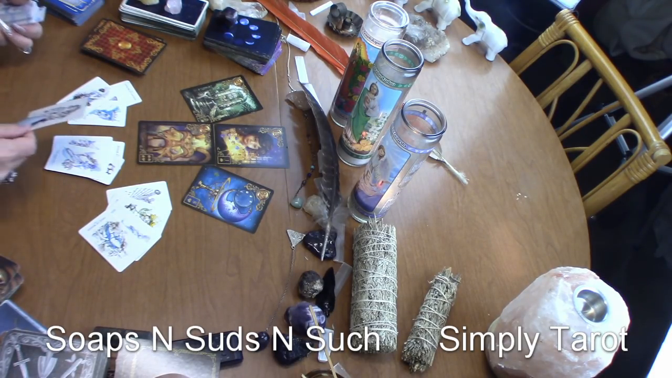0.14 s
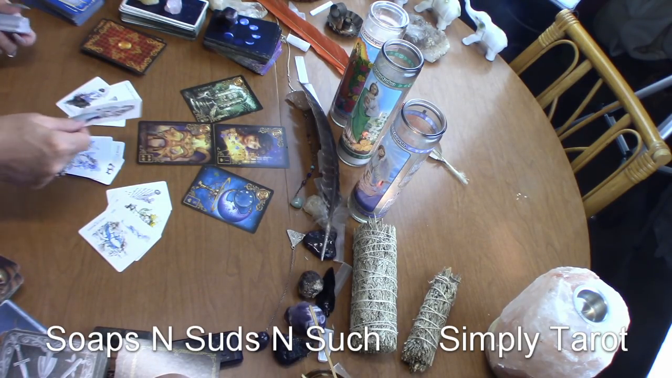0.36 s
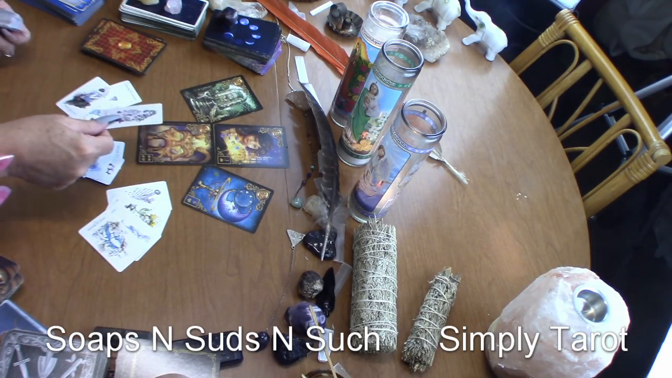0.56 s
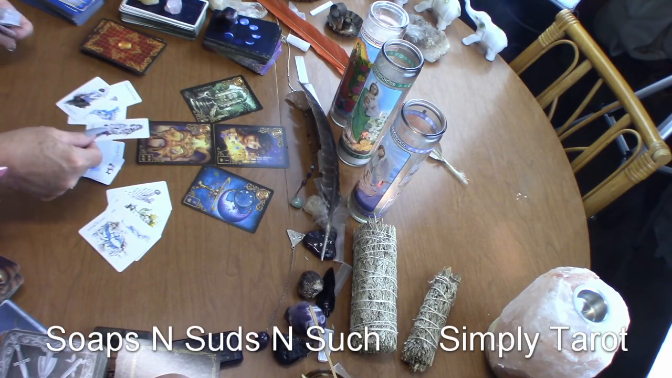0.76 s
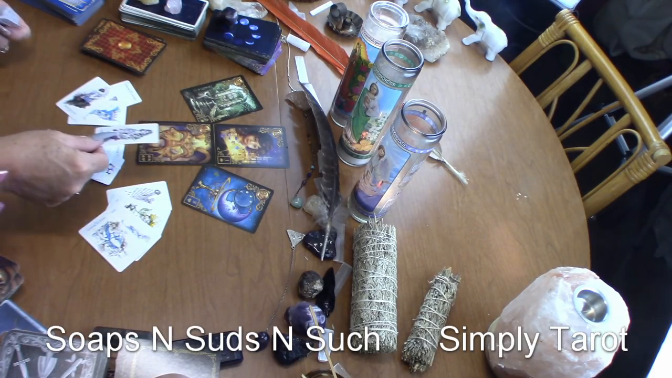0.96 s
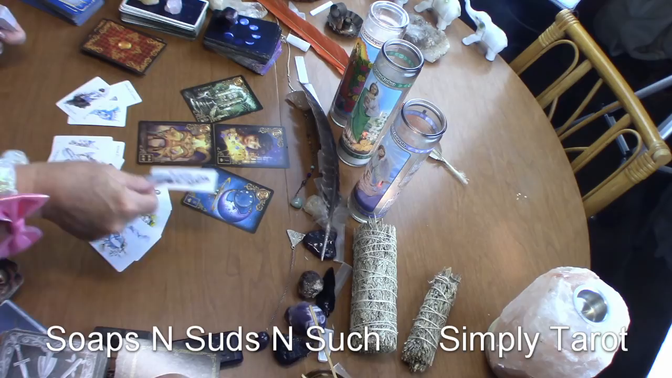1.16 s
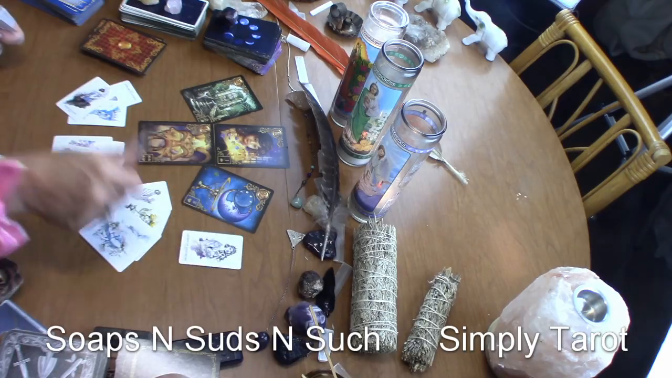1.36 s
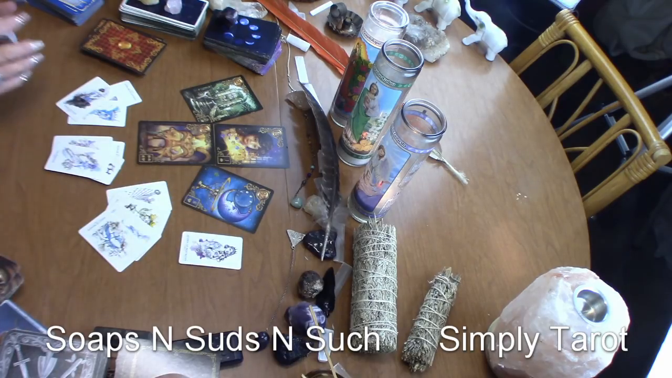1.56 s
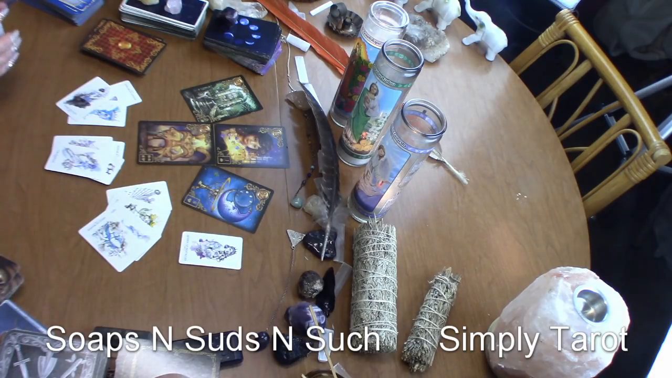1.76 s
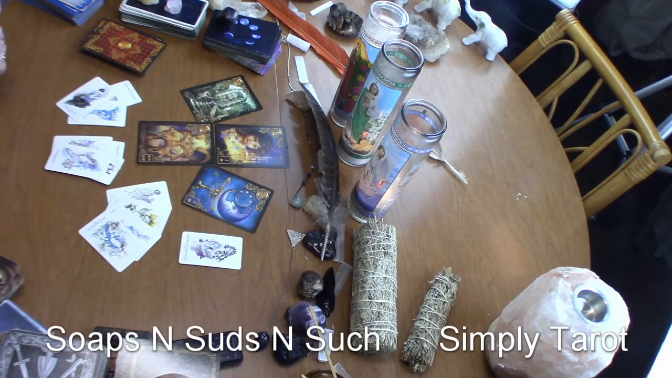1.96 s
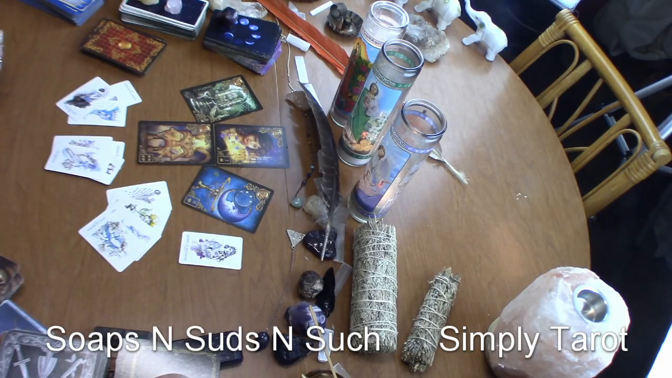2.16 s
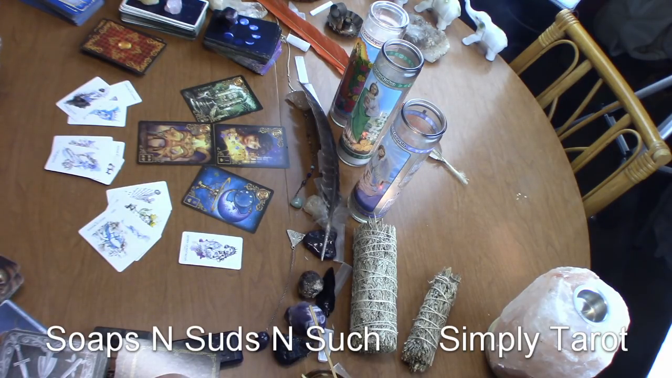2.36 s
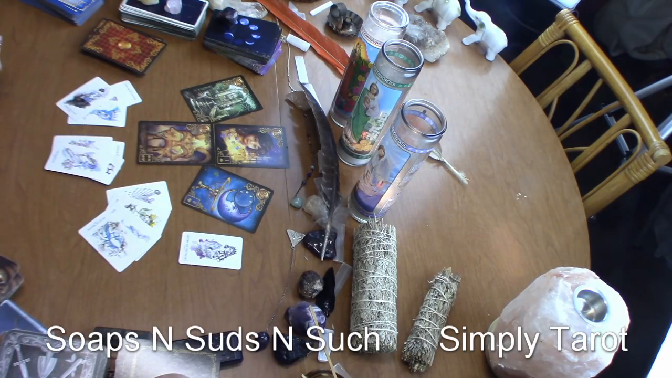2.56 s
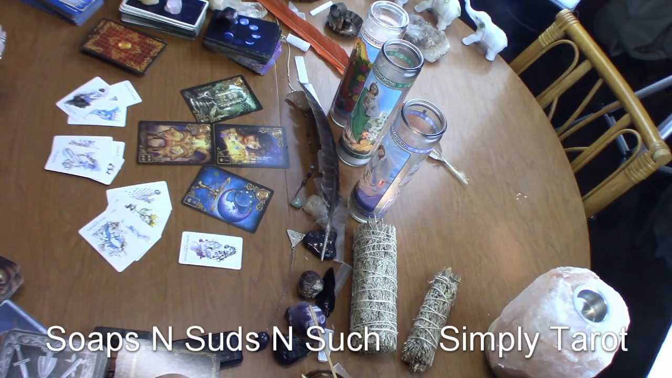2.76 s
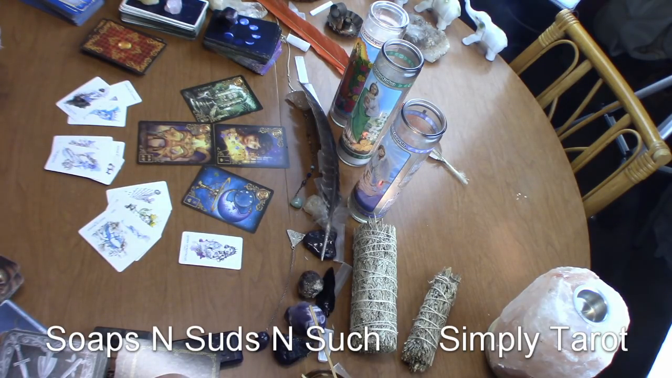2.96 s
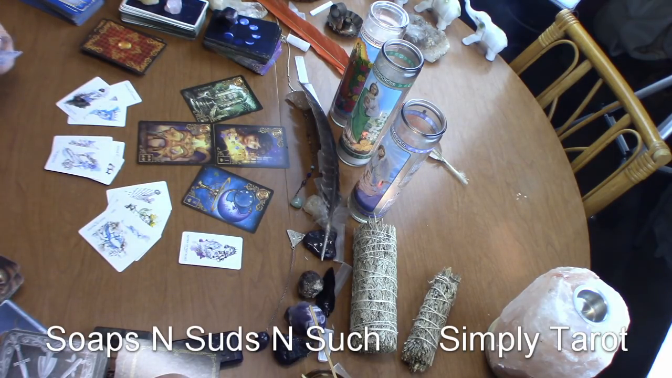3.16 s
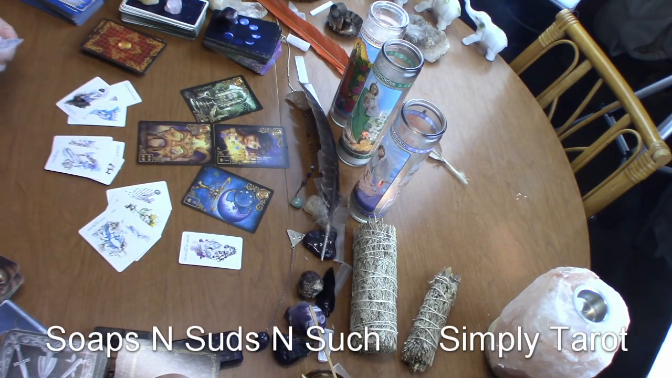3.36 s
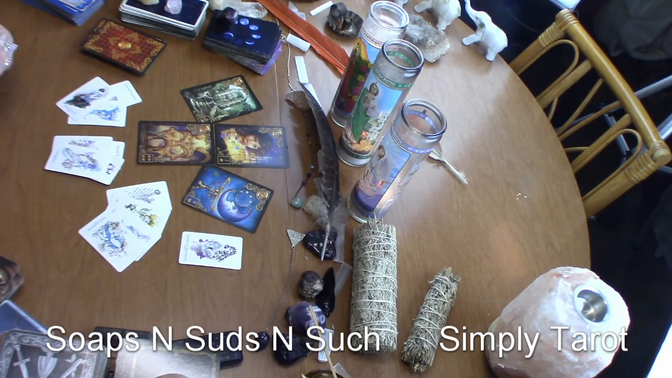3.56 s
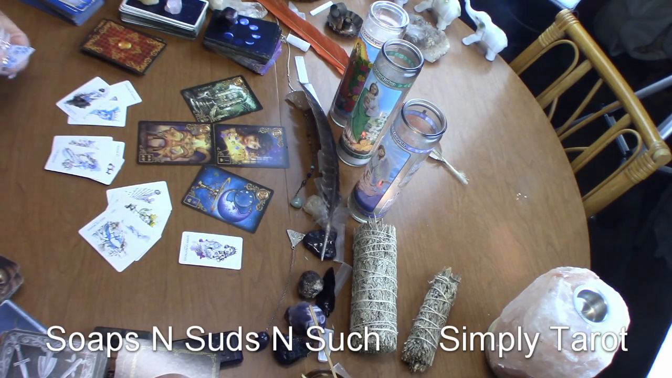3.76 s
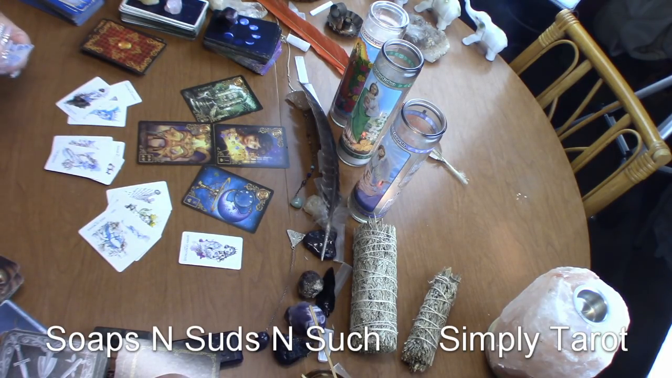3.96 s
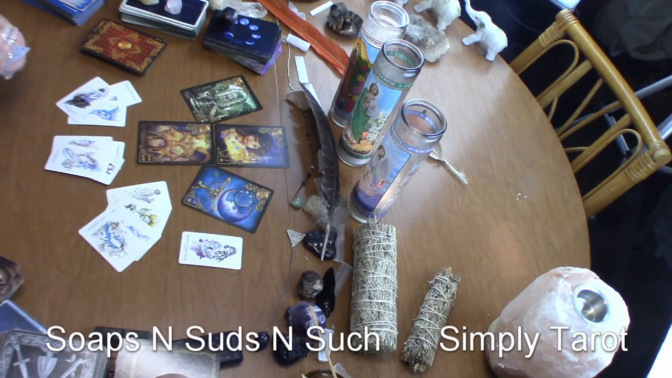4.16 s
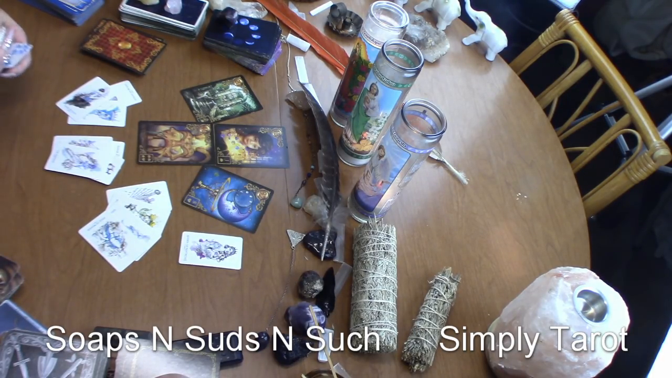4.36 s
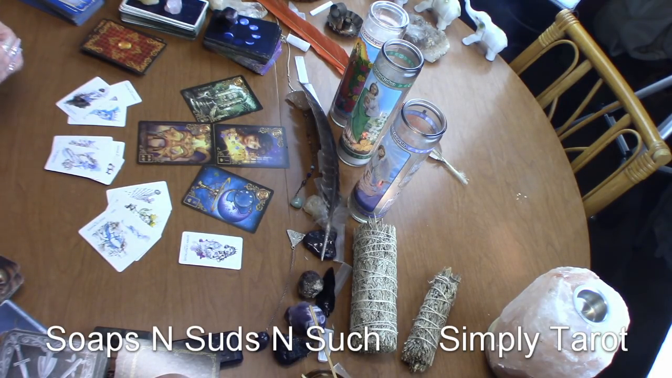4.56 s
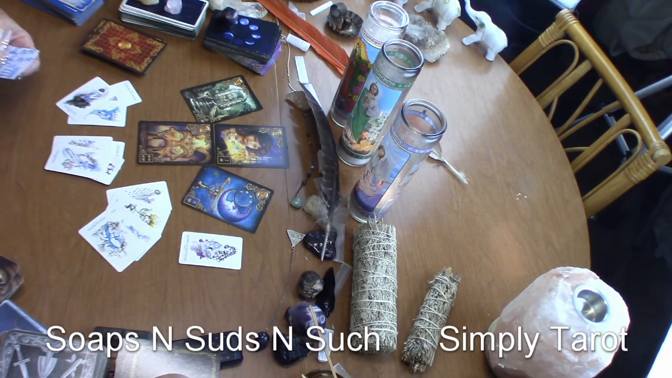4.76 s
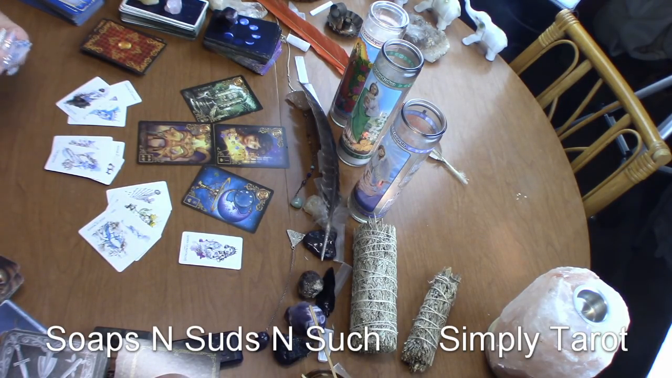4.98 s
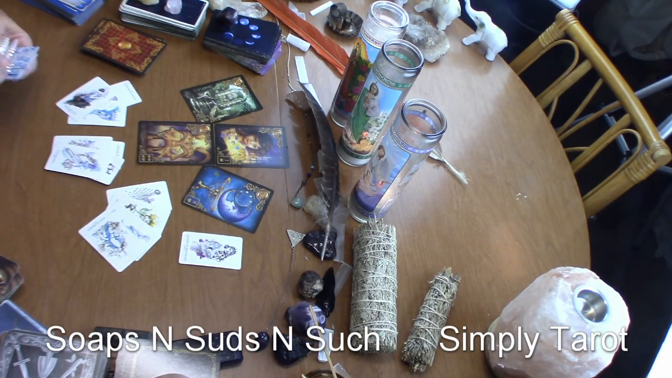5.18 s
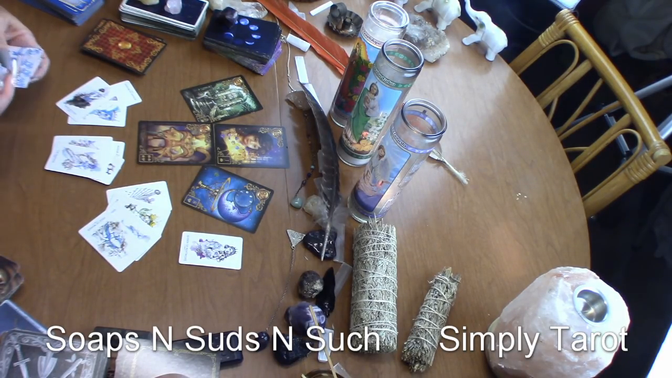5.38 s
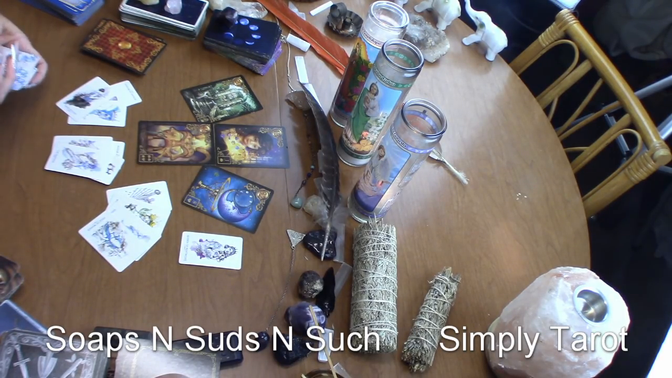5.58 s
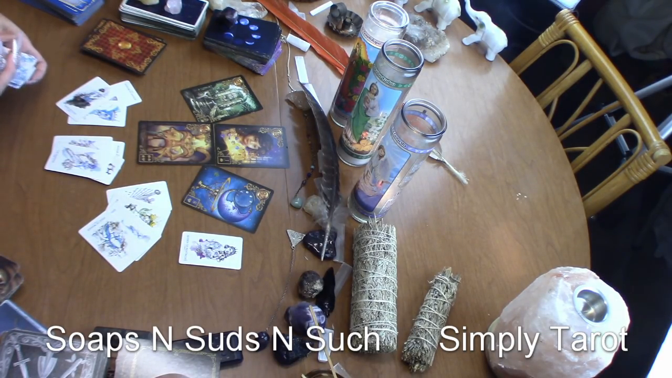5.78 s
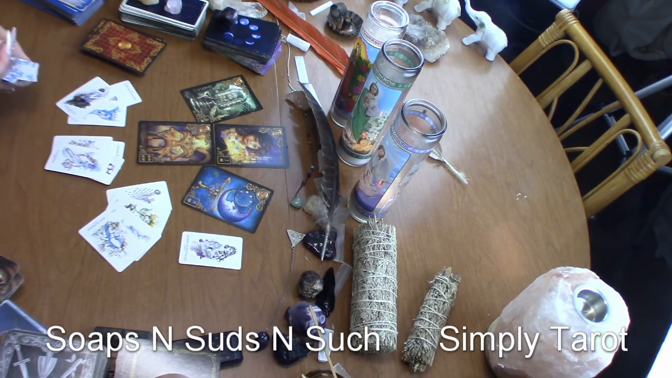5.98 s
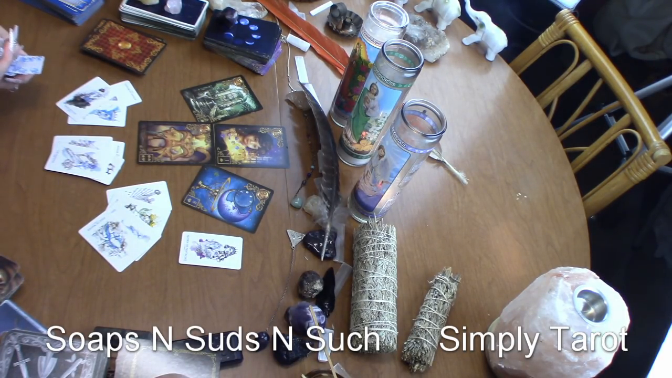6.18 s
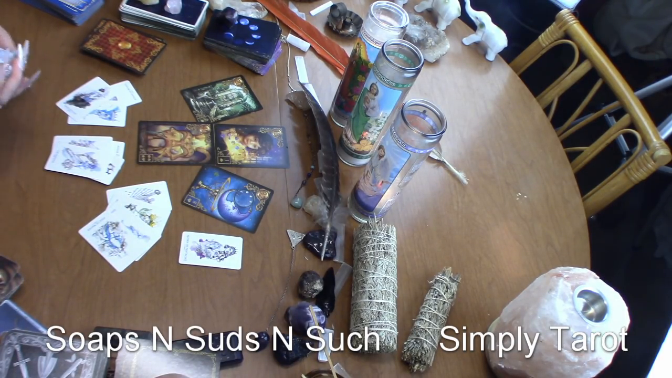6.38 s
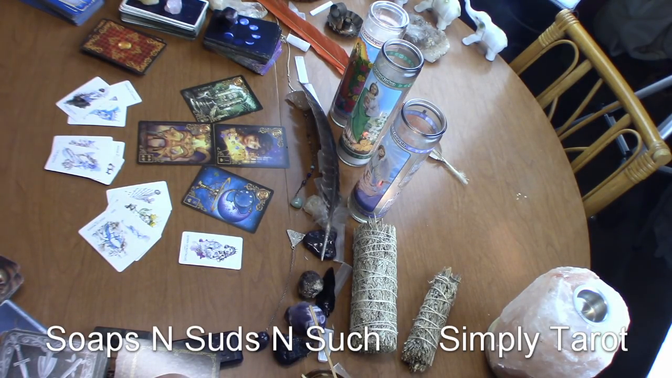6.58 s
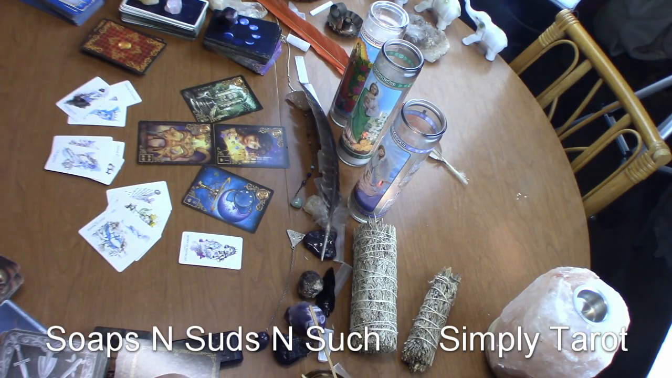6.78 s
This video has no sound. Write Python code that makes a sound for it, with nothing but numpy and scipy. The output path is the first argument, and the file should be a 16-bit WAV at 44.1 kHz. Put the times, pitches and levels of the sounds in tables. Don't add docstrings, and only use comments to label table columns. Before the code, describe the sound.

One playing card snaps sharply onto a wooden table, then a deck is shuffled overhand with papery hisses, cracks and taps, close up.

```python
import sys
import numpy as np
from scipy import signal
from scipy.fft import rfft, irfft, next_fast_len
from scipy.io import wavfile

SR = 44100
rng = np.random.default_rng(int(sys.argv[2]) if len(sys.argv) > 2 else 0)


def inscribe(sig):
    pcm = np.round(np.clip(np.atleast_2d(sig).T, -1, 1) * 32767)
    wavfile.write(sys.argv[1], SR, pcm.astype(np.int16))


def gain_from_db(level_db):
    decades = np.asarray(level_db, float) / 20
    return 10 ** decades


N = 300934
PLACES = 4

# (frequency [Hz], density [dB per Hz])
AIR_SPECTRUM = [(15, -37.5), (25, -30), (127, -8.5), (317, -2.5), (463, -4), (796, -4.5), (1160, -9),
                (2350, -14), (2990, -15), (3250, -15.5), (5430, -20), (9570, -27), (13600, -37),
                (16000, -37)]
# (frequency [Hz], level [dB rms])
MAINS_HUM = [(118.4, -77.5)]
# (frequency [Hz], density [dB per Hz])
PAPER_SPECTRUM = [(120, -48.5), (200, -16.5), (867, -11), (1710, -9), (2860, -3), (3190, -7), (4350, -7),
                  (9060, -14), (13300, -23), (16000, -20)]
# (start [s], hold [s], level [dB], brightness [dB])
SLIDES = [(0.01, 0.33, -73, -7), (0.414, 0.023, -54.5, 1.5), (1.74, 0.028, -57.5, 3),
          (1.88, .02, -51.5, -2), (1.958, 0.095, -63.5, 4.5), (2.28, 0.025, -67, 5),
          (2.45, 0.025, -62.5, 1), (2.697, 0.028, -62.5, -7), (2.918, 0.016, -66.5, 10.5),
          (3.035, 0.11, -55.5, 0), (3.148, 0.04, -46, 1.5), (3.408, 0.032, -44, 5),
          (3.484, 0.011, -35.5, -1.5), (3.695, 0.083, -46, 4), (3.922, 0.1, -45.5, -1),
          (4.112, 0.089, -46, -2), (4.308, 0.012, -50.5, -1), (4.38, .06, -65.5, -20),
          (4.512, 0.017, -58, -10), (4.656, 0.11, -46, 1), (4.944, .11, -40, -2), (5.22, .15, -65, -6),
          (5.705, 0.016, -51, 1.5), (5.878, 0.066, -49.5, 0), (6.033, 0.023, -51.5, -3),
          (6.08, 0.031, -62, 6), (6.294, 0.19, -69, 9), (6.618, 0.22, -53.5, -3)]
# (frequency [Hz], width [Hz], level [dB])
DECK_RINGS = [(480, 85, 5), (889, 62, 3.5), (1200, 120, 1), (1600, 100, -3.5), (2540, 70, 0),
              (2923, 96, -1), (3900, 97, -14.5), (5490, 160, -9)]
# (frequency [Hz], T60 [s])
ROOM_DECAY = [(200, 0.21), (530, 0.17), (1390, 0.17), (3680, 0.15), (9700, 0.14)]
# (delay [s], level [dB])
NEAR_ECHOES = [
    (.0025, -5),
    (.0062, -8.5),
    (0.01, -8.5),
]
# (time [s], peak [dB], packet knock re peak [dB], edge tick re peak [dB])
FINGER_SHIFTS = [(0.1897, -42, -3, 6), (0.5158, -39, -7, 5), (0.532, -44.5, -3, 7.5),
                 (0.818, -47.5, -19, 5), (1.7112, -47.5, 5, -10), (1.7829, -44, -0.5, -10),
                 (1.884, -45, 2, -5), (2.1897, -57, -6, 24.5), (2.262, -39, -26, 8.5), (2.432, -42, -2, 3),
                 (2.547, -45, -2, -12), (2.727, -46, -10, -2), (2.802, -58, 17.5, -11),
                 (4.2344, -32, -3.5, 9.5), (4.5365, -40, -14, -17.5), (6.4593, -44, -3.5, -11),
                 (6.5587, -46, -2, -9)]
# (time [s], peak [dB], packet knock re peak [dB], edge tick re peak [dB], flex pitch [Hz])
EDGE_CRACKS = [(1.4108, -22.5, 7.5, 3, 4900), (1.446, -1, -11.5, 4, 3200), (1.451, -15, -3.5, 1.5, 3630),
               (1.4632, -3, -10, -12.5, 3900), (1.9555, -38.5, 6.5, 12.5, 3320),
               (3.194, -19.5, -0.5, 0.5, 2530), (3.4715, 0, -5, -5, 4700), (3.7357, -19, -23, -3, 2540),
               (3.783, -6, -3, -23, 2680), (3.7849, -3, -18, 0.5, 4180), (4.0635, -5.5, -6.5, -18, 5630),
               (4.0673, -4, -16, 5.5, 5000), (4.1706, -20.5, -5, 0, 3200), (4.5898, -17.5, -3, -14, 2750),
               (4.8019, -18.5, -7.5, -13, 3160), (4.833, -7.5, -31, 2, 2950),
               (4.8355, -10.5, -8, -13, 2780), (5.0953, -29, 13, -25, 2250),
               (5.3127, -37.5, -4.5, -18, 3780), (5.612, -27, -2, -9.5, 3520), (5.6216, 1, -19, 5.5, 3360),
               (5.7894, -15.5, -10, -16, 3050), (5.8777, -22.5, -10.5, -2, 3300),
               (6.397, -36.5, -20.5, 4, 3450)]
# (time [s], peak [dB], packet knock re peak [dB], flex pitch [Hz])
FLAT_TAPS = [(1.4165, -23, 10.5, 5000), (1.421, -25.5, 15, 3240), (3.0155, -37.5, -6, 5270),
             (3.1326, -34.5, 6, 2950), (3.139, -31, -6, 6500), (3.1881, -31.5, 7, 4440),
             (3.398, -30, 1, 2840), (3.6496, -23.5, -15, 2680), (3.655, -23, -2, 4400),
             (3.696, -34, 3, 4290), (3.9125, -31, -12, 3520), (3.916, -20.5, -2.5, 3450),
             (4.2519, -31, -7.5, 3030), (4.3062, -36, -7, 2460), (4.6728, -41, -11, 3040),
             (4.6969, -32, 1, 2760), (4.7597, -37.5, 4, 2120), (4.8266, -11, -1.5, 2940),
             (4.943, -22.5, -8, 3140), (4.948, -21, -1, 3600), (4.961, -12.5, -8.5, 3500),
             (4.969, -22.5, -17, 3030), (5.051, -21.5, -25, 4060), (5.055, -27.5, -0.5, 3830),
             (5.08, -24.5, -7, 5060), (5.1007, -16.5, -22, 3300), (5.63, -8, -13, 4670),
             (5.9097, -33.5, -0.5, 3030), (6.066, -36, -1.5, 3400), (6.099, -35.5, -10, 5100)]
# (time [s], peak [dB], packet knock re peak [dB], flex pitch [Hz])
PACKET_BRUSHES = [(3.1452, -24.5, -1.5, 2500), (3.158, -36.5, -3, 5940), (3.203, -32, -6.5, 2770),
                  (3.31, -43, -7, 5120), (3.3267, -24.5, 0, 3700), (3.4584, -25, -8, 3340),
                  (3.4681, -5.5, -13, 2380), (3.7226, -25, -12, 3280), (3.7777, -18, -6, 2900),
                  (3.9868, -26.5, 0, 3700), (3.9983, -22.5, -18, 3140), (4.048, -23, -11.5, 3490),
                  (4.0594, -10.5, -5.5, 2680), (4.9298, -43, -10, 3010), (5.6275, -21, -22, 3570),
                  (5.99, -37.5, 5.5, 5250), (6.0588, -33.5, 2, 2900)]
# (time [s], peak [dB], pitch [Hz])
LANDINGS = [(1.41, -36, 447), (1.4471, -28.5, 406), (1.9548, -49.5, 425), (3.139, -44, 483),
            (3.1907, -42.5, 393), (3.196, -37.5, 149), (3.327, -35.5, 560), (3.4715, -28.5, 480),
            (3.65, -38, 496), (3.7825, -21.5, 535), (3.785, -40, 258), (3.474, -37.5, 248),
            (4.066, -31, 272), (3.9135, -33, 520), (4.0637, -26, 484), (4.171, -64, 398),
            (4.59, -36, 480.0), (4.802, -36.5, 480), (4.827, -56, 406), (4.949, -48, 485),
            (5.0962, -42, 510.0), (5.6216, -44, 480.0), (5.7895, -41, 455)]
# (from [s], to [s])
LONE_CARD_TIME = (1.3, 1.6)
# (frequency [Hz], width [Hz], level [dB])
LONE_CARD_RING = (6800, 440, 2)
# (start [s], length [s], level [dB], pitch [Hz], width [Hz])
THUMB_DRAG = (4.385, .16, -63, 1725, 22)


def rms_one(x):
    return x / np.sqrt(np.mean(x ** 2) + 1e-20)


def peak_one(x):
    return x / np.abs(x).max()


def at_hz(points, hz):
    table_hz, value = np.array(points).T
    return np.interp(np.log(hz), np.log(table_hz), value)


def band(x, low_hz, high_hz):
    edges = [low_hz, min(high_hz, .47 * SR)]
    return signal.sosfilt(signal.butter(2, edges, "band", fs=SR, output="sos"), x)


def resonance(x, hz, width):
    r = np.exp(-np.pi * width / SR)
    poles = [1, -2 * r * np.cos(2 * np.pi * hz / SR), r * r]
    return signal.lfilter([(1 - r * r) / 2, 0, (r * r - 1) / 2], poles, x)


def coloured(x, spectrum):
    size = next_fast_len(N)
    hz = np.maximum(np.fft.rfftfreq(size, 1 / SR), 1)
    return rms_one(irfft(rfft(x, size) * gain_from_db(at_hz(spectrum, hz)), size)[:N])


def drift(rate):
    r = np.exp(-2 * np.pi * rate / SR)
    return rms_one(signal.lfilter([1], [1, -2 * r, r * r], rng.standard_normal(N + SR))[SR:])


def room_tone():
    t = np.arange(N) / SR
    hum = 0
    for hz, db in MAINS_HUM:
        level = gain_from_db(db + 2.5 + 0.5 * drift(1.4))
        hum = hum + level * np.sin(2 * np.pi * hz * t + 0.71 * drift(3))
    air_level = gain_from_db(-59 + 0.32 * drift(0.9))
    return air_level * coloured(rng.standard_normal(N), AIR_SPECTRUM) + hum


def sliding():
    rise_db_per_s, fall_db_per_s, resting_db = 244, 224.5, -77
    t = np.arange(N) / SR
    grains = rng.standard_normal(N) * gain_from_db(4.0 * drift(400) + 2.5 * drift(40))
    rub = coloured(grains, PAPER_SPECTRUM)
    top = band(rub, 2300, 23000)
    body_level = top_level = gain_from_db(resting_db)
    for start, hold, level_db, bright_db in SLIDES:
        before = np.maximum(start - t, 0)
        after = np.maximum(t - start - hold, 0)
        fade_db = rise_db_per_s * before + fall_db_per_s * after
        stroke = gain_from_db(level_db - np.minimum(fade_db, 100.))
        body_level = body_level + stroke
        top_level = top_level + stroke * gain_from_db(bright_db)
    return body_level * (rub - top) + top_level * top


def deck(held):
    grip_db = 3 * rng.standard_normal((len(DECK_RINGS), PLACES, 1))
    rings = 0
    for (hz, width, db), grip in zip(DECK_RINGS, grip_db):
        rings = rings + gain_from_db(db + grip) * resonance(held, hz, width)
    return held + rings


def room(x, tail_db):
    size = 16384
    t = np.arange(size) / SR
    edges = 120 * 2 ** np.arange(0, 7.6, .5)
    white = rng.standard_normal((2, PLACES, size))
    tail = 0
    for k, (low, high) in enumerate(zip(edges, edges[1:])):
        t60 = at_hz(ROOM_DECAY, np.sqrt(low * high))
        tail = tail + band(white[k % 2], low, high) * gain_from_db(-60 * t / t60)
    response = gain_from_db(tail_db) * tail * (1 - np.exp(-t / 0.0018))
    response[:, 0] = 1
    for delay, db in NEAR_ECHOES:
        arrival = (delay * SR * rng.uniform(.8, 1.2, PLACES)).astype(int)
        response[np.arange(PLACES), arrival] += gain_from_db(db)
    return signal.fftconvolve(x, response, axes=1)[:, :N].sum(axis=0)


def contacts():
    found = []
    for row in EDGE_CRACKS:
        found.append((*row, 0.00097 * gain_from_db(-0.13 * (row[1] + 22))))
    for s, db, knock, hz in FLAT_TAPS:
        found.append((s, db, knock, -7, hz, .0023))
    for s, db, knock, hz in PACKET_BRUSHES:
        found.append((s, db, knock, -3, hz, .0046))
    for row in FINGER_SHIFTS:
        found.append((*row, 3100, .0015))
    return found


def slaps():
    size = 2048
    out = np.zeros((PLACES, N + size))
    t = np.arange(size) / SR
    for k, (s, peak_db, knock_db, tick_db, flex_hz, length) in enumerate(contacts()):
        age = t / np.clip(length, .0002, .02)
        cracks = rng.standard_normal((3, size)) ** 3
        force = cracks * (1 - np.exp(-age * 5.7)) * np.exp(-age)
        force[:, 1:4] += 0.002 / length
        broad = band(force[0], 1700, 7530)
        flex = peak_one(resonance(broad, flex_hz, 850) + .27 * broad)
        knock = gain_from_db(knock_db - 4.5) * peak_one(band(force[1], 594, 1800))
        tick = gain_from_db(tick_db - 6.5) * peak_one(band(force[2], 5350, 13500))
        at = int(s * SR)
        out[k % PLACES, at:at + size] += gain_from_db(peak_db + 1.0) * (flex + knock + tick)
    return out[:, :N]


def thuds():
    size = 2048
    out = np.zeros(N + size)
    push = np.r_[np.hanning(40), np.zeros(size - 40)]
    for s, peak_db, hz in LANDINGS:
        ring = resonance(push, hz, 93) + 0.34 * resonance(push, 0.61 * hz, 99)
        at = int(s * SR)
        out[at:at + size] += gain_from_db(peak_db + 1) * peak_one(ring)
    return out[:N]


def on_table(card):
    bounce_s, bounce_db = .00027, -9.5
    hz, width, db = LONE_CARD_RING
    card = card + gain_from_db(db) * resonance(card, hz, width)
    return card + gain_from_db(bounce_db) * np.roll(card, int(bounce_s * SR + .5), axis=1)


def squeak():
    start, length, db, hz, width = THUMB_DRAG
    t = np.arange(N) / SR
    swell = np.sin(np.pi * np.clip((t - start) / length, 0, 1)) ** .5
    once = resonance(rng.standard_normal(N), hz, width)
    return gain_from_db(db) * swell * rms_one(resonance(once, hz, width))


def scene():
    cards = gain_from_db(-4.5) * slaps()
    cards[0] += gain_from_db(-8) * sliding()
    t = np.arange(N) / SR
    lone = (t > LONE_CARD_TIME[0]) & (t < LONE_CARD_TIME[1])
    held = deck(cards * ~lone)
    card = on_table(cards * lone)
    thud = thuds()
    held[1] += thud * ~lone
    card[1] += thud * lone
    heard = room(held, tail_db=-24.5) + room(card, tail_db=-27.5)
    heard = band(heard, 140, 9700)
    return (heard + room_tone() + squeak())[None]


def band_limit(x):
    return signal.sosfilt(signal.butter(12, 16480, fs=SR, output="sos"), x)


def record(dry):
    soft = .93 * np.tanh(dry / .93)
    rounded = .5 * soft + .5 * np.clip(dry, -.9, .9)
    treble_stop = signal.cheby2(10, 50, 16600, fs=SR, output="sos")
    mix = signal.sosfilt(treble_stop, rounded)
    return band_limit(mix)


dry = scene()
out = record(dry)
inscribe(out)
```